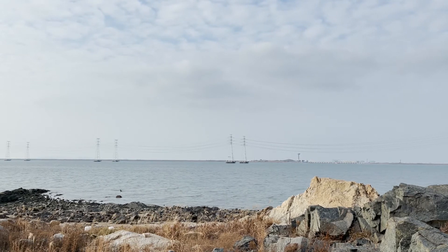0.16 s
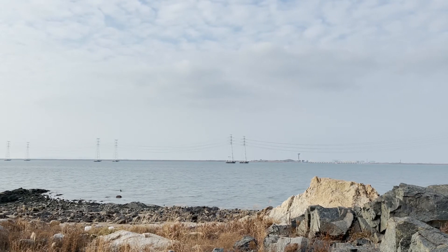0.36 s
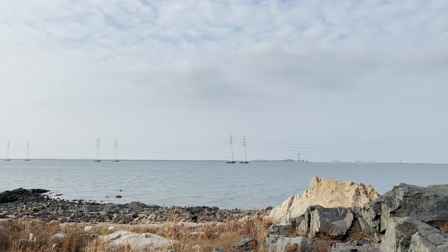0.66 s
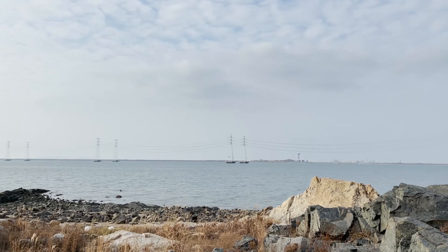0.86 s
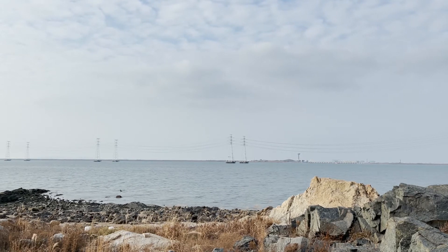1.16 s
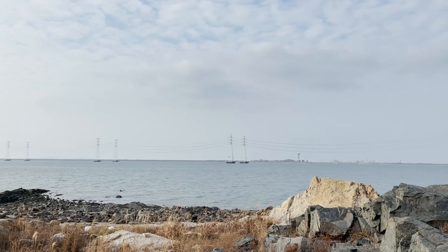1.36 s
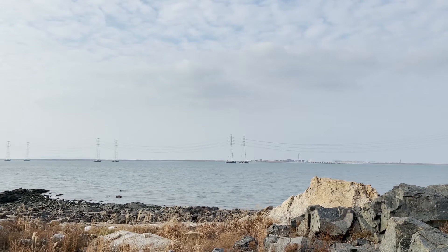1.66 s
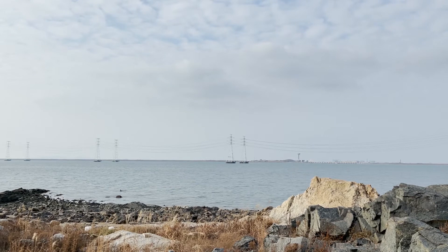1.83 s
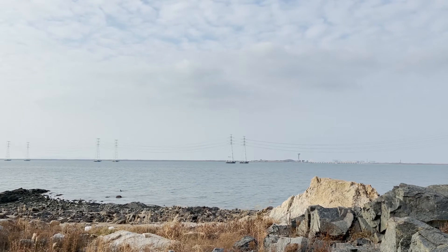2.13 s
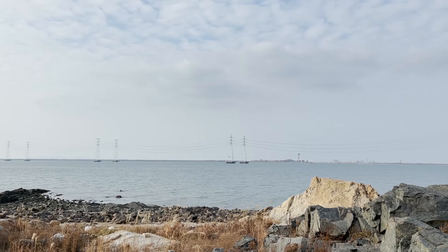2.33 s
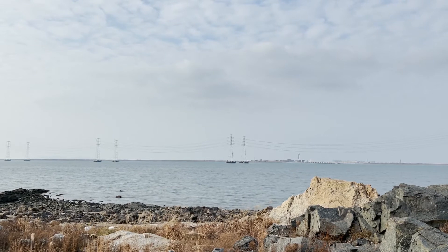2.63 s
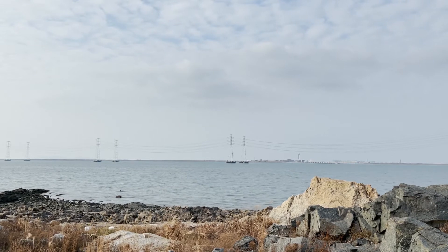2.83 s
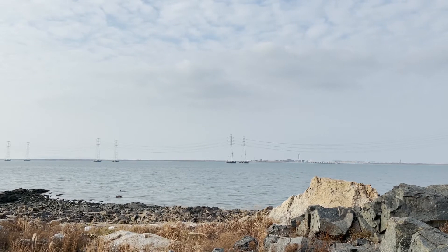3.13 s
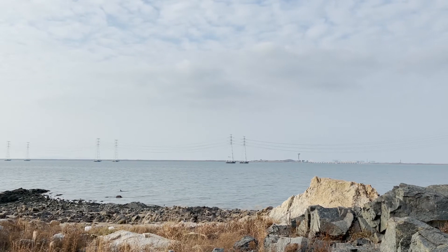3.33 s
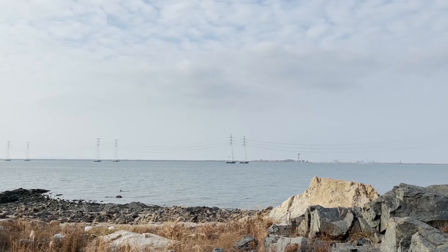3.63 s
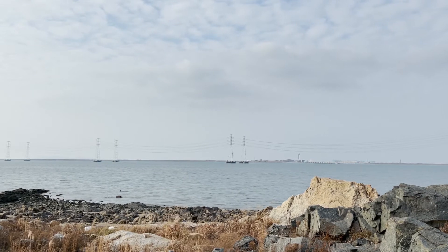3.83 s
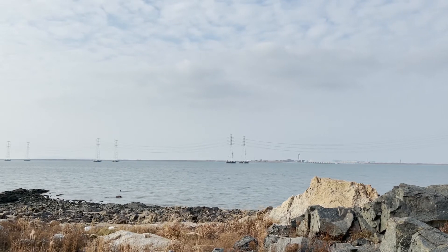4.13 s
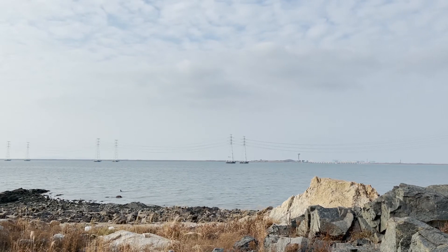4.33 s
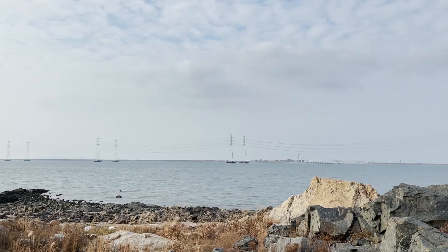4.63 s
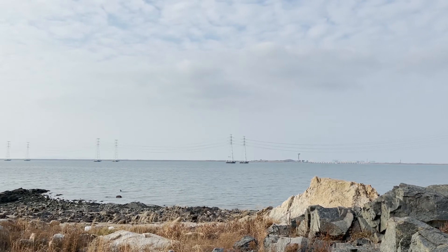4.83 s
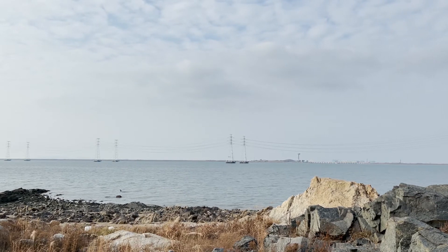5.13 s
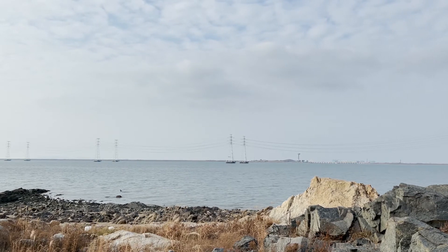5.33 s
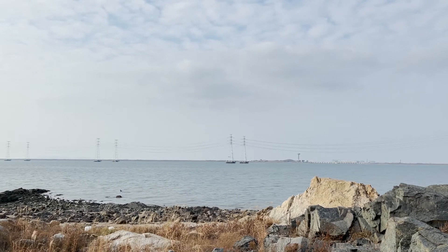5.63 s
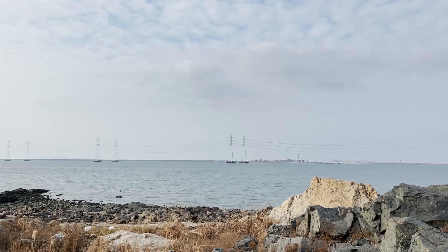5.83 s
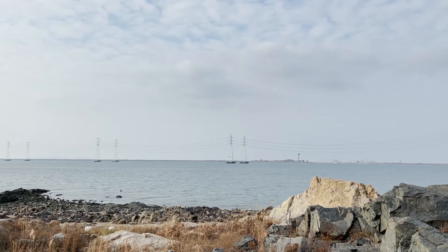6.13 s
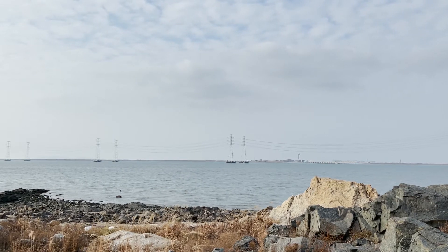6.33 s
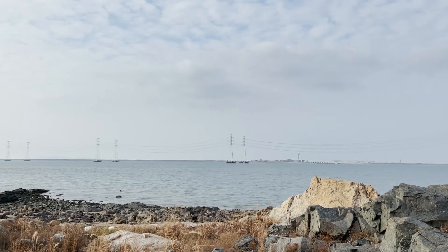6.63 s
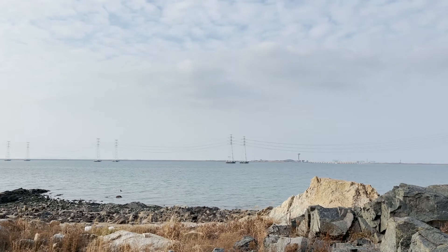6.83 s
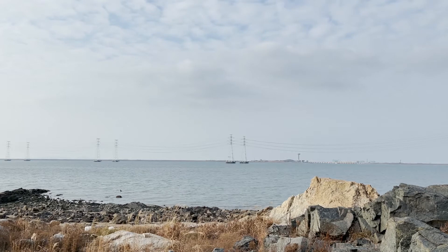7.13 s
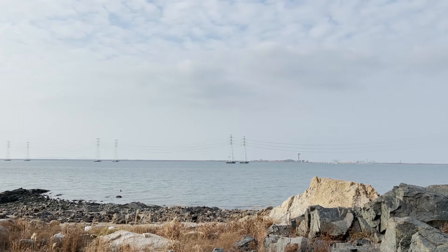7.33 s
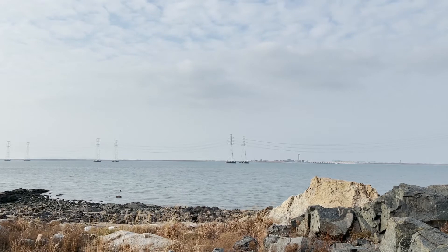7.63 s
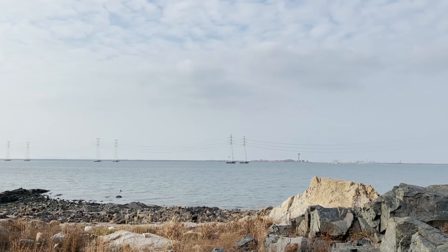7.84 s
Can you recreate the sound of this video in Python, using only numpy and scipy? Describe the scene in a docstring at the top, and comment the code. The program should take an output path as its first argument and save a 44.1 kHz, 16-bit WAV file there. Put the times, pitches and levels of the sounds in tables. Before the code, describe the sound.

Close stereo microphones near stones at the water's edge pick up irregular lapping: tiny rising bubble tones, wet droplet ticks on rock and thin fizzing wash. Activity comes in clusters with near-still gaps between, sides shifting left and right. The stones give short, dry reflections. Behind lies a soft low wash from the far shore with wavering engine hum, and brief soft wind buffets around three to four seconds.

```python
"""Small waves lapping on shore rocks

Trapped air pockets ring as gliding sines, mostly upward in pitch; drops and thin sheets of water splat
on stone as noise bursts with a small bubble; a wave slaps a hollow, exciting its damped resonances.
Random grains and filtered noise make the wash, and short scattered returns come off the stones.
Far engines drone as drifting sines over far-shore noise; a light wind rumbles on both microphone ports."""
import sys
import numpy as np
from scipy import signal
from scipy.fft import rfft, irfft, next_fast_len
from scipy.io import wavfile
from scipy.ndimage import map_coordinates

SR = 44100
rng = np.random.default_rng(int(sys.argv[2]) if len(sys.argv) > 2 else 0)


def put_to_file(sound):
    """Save the sound as 16-bit audio at rate SR, in the file named by the first command-line argument."""
    columns = np.atleast_2d(sound).T  # one column per channel
    safe = np.clip(columns, -1, 1)
    whole_steps = np.round(safe * 32767)
    wavfile.write(sys.argv[1], SR, whole_steps.astype(np.int16))


N = 351918

LAG = 0.07  # samples by which each port shifts per dB of level difference; the louder port is later
# a pinched-off bubble starts up to this share sharp and settles with this decay constant in cycles
SNAP, SNAP_CYCLES = 1.196, 0.7


def amp(db):
    """Decibels to amplitude ratio."""
    return 10 ** (np.asarray(db) / 20)


def unit(x):
    """Normalise to a root-mean-square value of 1."""
    return x / np.sqrt(np.mean(x ** 2) + 1e-20)


def along(points, hz):
    """Interpolate (hz, value) points on a logarithmic frequency axis."""
    f, v = np.transpose(points)
    return np.interp(np.log(hz + 1), np.log(f + 1), v)


def curves(rows):
    """Linear interpolation to one value per sample for each column after the time."""
    s, *cols = np.transpose(rows)
    return [np.interp(np.arange(N) / SR, s, c) for c in cols]


def wobble(rate, count=N):
    """A smooth random curve: a spline through Gaussian knots, rate of them a second."""
    knots = rng.standard_normal(int(count * rate / SR) + 4)
    return map_coordinates(knots, [np.arange(count) * rate / SR])


def filtered(x, response):
    """Linear filtering: the spectrum times a response of frequency."""
    m = next_fast_len(N + SR // 2)
    return irfft(rfft(x, m) * response(np.fft.rfftfreq(m, 1 / SR)), m)[..., :N]


def sides(pan_db):
    """Level-difference panning: left and right gains of mean power 1."""
    pair = amp(np.array([pan_db, -pan_db]) / 2)
    return pair / np.sqrt(np.mean(pair ** 2, axis=0))


def add(out, s, sound, pan_db):
    """Superpose a sound at s seconds, with level and arrival-time differences between the ports."""
    for side, gain, lag in zip(out, sides(pan_db), (LAG * pan_db, -LAG * pan_db)):
        room = side[max(round(s * SR + lag), 0):][:len(sound)]
        room += gain * sound[:len(room)]


def pinch(cycles):
    """Relaxation after pinch-off: extra cycles run while a new bubble drops to its pitch."""
    return SNAP * SNAP_CYCLES * (1 - np.exp(-cycles / SNAP_CYCLES))


def arc(u, start, middle, end):
    """Quadratic interpolation through three values at u = 0, 1/2, 1."""
    return start * (1 - u) * (1 - 2 * u) + 4 * middle * u * (1 - u) + end * u * (2 * u - 1)


def glides(rows, attack, release, waver_db, waver_rate, sag=1, snap=0, shake=0):
    """Frequency modulation: sines whose phase integrates an arc of pitch while the level slides."""
    out = np.zeros((2, N))
    for s, length, *hz, start_db, end_db, pan_db in rows:
        t = np.arange(round((length + release) * SR)) / SR
        u = np.minimum(t / length, 1)
        onset = 1 - np.exp(-(t / attack) ** 2)
        ending = amp(-40 * np.maximum(t - length, 0) / release)
        slide_db = start_db + (end_db - start_db) * u ** sag
        level = amp(slide_db + waver_db * wobble(waver_rate, count=len(t))) * onset * ending
        log_pitch = arc(u, *np.log(hz)) + shake * wobble(2 * waver_rate, count=len(t))
        cycles = np.cumsum(np.exp(log_pitch)) / SR + snap * pinch(hz[0] * t)
        add(out, s, level * np.sin(2 * np.pi * cycles), pan_db)
    return out


def distance():
    """Partly correlated noise for the wash of the far shore, and drifting sines for engine tones."""
    # far water and traffic: hz, relative_db (per Hz)
    shore = [(35, -19), (60, 4), (172, -2.5), (338, -11), (607, -18), (862, -22), (1040, -30), (1440, -27),
             (2300, -34), (3940, -40), (11800, -42), (16000, -47)]
    # side of that wash: hz, left_minus_right_db
    lean = [(60, 6), (130, 10.5), (290, 5), (700, -3.5)]
    # far engine tones, drifting as the engines move: start_s, length_s, start_hz, middle_hz, end_hz,
    # start_db, end_db, left_minus_right_db
    engines = [(0, 1.3, 179, 173, 169, -49.5, -50.5, 5), (1.75, 1.25, 167, 166, 167, -54, -51, 5),
               (0, .7, 412, 411, 410, -65, -64, 2), (2.1, .8, 385, 382, 380, -66, -66, 2),
               (3.0, 3.0, 165, 157, 143, -58, -58, 6), (0, 3.0, 266, 257, 238, -63, -62, 4),
               (.2, 1.5, 207, 201, 193, -57, -56, 0), (.2, 2.2, 218, 224, 231, -59, -60, -3),
               (3.7, 2.5, 213, 195, 185, -57, -56, -4), (5.0, 1.0, 99, 101, 104, -57, -57, 0),
               (6.9, .8, 262, 277, 292, -64, -62, 3), (7.0, 1.0, 127, 132, 140, -58, -53, 3)]
    common, *own = rng.standard_normal((3, N))
    noise = 0.79 * common + np.array(own)
    hiss = filtered(noise, lambda hz: amp(along(shore, hz)) * sides(along(lean, hz)))
    tones = glides(engines, attack=0.012, release=0.036, waver_db=2.0, waver_rate=3.53)
    return amp(-49.0 + 1.33 * wobble(2.94)) * unit(hiss) + tones


def wind():
    """Low-frequency pressure noise at each port: lumpy buffeting, uncorrelated from port to port."""
    # strength of the buffets: time_s, relative_db
    gusts = [(0.0, -59), (2.51, -69), (3.15, -50), (3.51, -62), (3.9, -49), (4.15, -44), (4.35, -52),
             (5.04, -60), (7.98, -61)]
    # spectrum of the buffeting: hz, relative_db (per Hz)
    rumble_spectrum = [(8.8, -13), (15, 1.5), (51, 2), (178, -11.5), (200, -5.5), (260, -39), (440, -120)]
    buffet_db, = curves(gusts)
    rumble = filtered(rng.standard_normal((2, N)), lambda hz: amp(along(rumble_spectrum, hz)))
    lumps_db = 3.1 * np.array([wobble(23), wobble(6.7)])  # left, right
    return amp(buffet_db + 7.5) * unit(rumble * amp(lumps_db))


def rocks(x):
    """Diffuse reflection: short scattered returns from the stones, each frequency with its own decay."""
    # decay off the stones: hz, t60_s
    decay = [(300, 0.14), (2000, 0.038), (10000, 0.033)]
    hz, t, z = signal.stft(rng.standard_normal((2, SR // 4)), SR, nperseg=128)
    tail = signal.istft(z * amp(-60 * t / along(decay, hz)[:, None]), SR, nperseg=128)[1]
    return signal.fftconvolve(x, tail / np.linalg.norm(tail[0]), axes=1)[:, :N]


def laps():
    """Power summation of wavelets over the calm: trickle level, spray level and side at every sample."""
    # wavelets breaking on the stones: crest_s, trickle_relative_db, spray_relative_db, left_minus_right_db
    wavelets = [(0.01, -63, -75.5, 12), (0.11, -67, -70, 4.5), (0.42, -68, -68.5, 5.5),
                (0.53, -62, -69, 11), (0.87, -54, -63.5, -0.5), (1.06, -55, -66, 0), (1.23, -46, -56, 9),
                (1.3, -47, -56, 8), (1.34, -50, -54, -2), (1.52, -47, -57, 2.5), (1.78, -49.5, -61.5, -0.5),
                (2.05, -54, -60, -3.5), (2.28, -53, -68, -1), (2.45, -57, -66.5, -2.5), (2.7, -49, -58, 6),
                (2.83, -56, -58.5, -9.5), (2.905, -58, -58, -1), (3.1, -58, -64.5, -2),
                (3.37, -60, -66.5, -2), (3.48, -67, -67.5, 8), (3.7, -58.5, -76.5, 7), (4.08, -52, -60, -3),
                (4.17, -46, -62, -8.5), (4.25, -52, -60, -6.5), (4.41, -53.5, -66, -3.5),
                (4.57, -56, -76, -8), (4.9, -61, -63.5, -1.5), (5.29, -55, -66.5, -2),
                (5.51, -55.5, -71.5, -12), (5.64, -58, -76.5, -9), (5.88, -60, -67, -5.5),
                (6.22, -63, -75, -4.5), (6.42, -58, -57, 7.5), (6.48, -57, -57, 5), (6.57, -62, -64, 8),
                (6.665, -48, -53, 18), (6.75, -49, -55, 12), (6.88, -58, -64.5, 18), (7.07, -56, -66, 11),
                (7.14, -70, -66.5, 18), (7.5, -61, -69, 9.5), (7.825, -58, -60.5, 21), (7.865, -45, -56, 9)]
    swell_db_per_s, drain_db_per_s = 160, 120  # trickle's build to the crest and run-off
    spray_faster = 2.2  # spray comes and goes this much faster
    calm_db, calm_spray_db = -75, -78  # between wavelets, on the scale of the table
    s, trickle_db, spray_db, pan_db = np.transpose(wavelets)[..., None]
    t = np.arange(0, N + 64, 64) / SR
    shape_db = np.minimum(swell_db_per_s * (t - s), drain_db_per_s * (s - t))
    # doubled decibels turn amplitude into power
    trickle = amp(2 * (trickle_db + shape_db))
    spray = amp(2 * (spray_db + spray_faster * shape_db))
    side = np.sum(pan_db * trickle, axis=0) / (trickle.sum(axis=0) + 1e-20)
    trickle_level = 10 * np.log10(trickle.sum(axis=0) + amp(2 * calm_db))
    spray_level = 10 * np.log10(spray.sum(axis=0) + amp(2 * calm_spray_db))
    return curves(np.transpose([t, trickle_level, spray_level, side]))


def grains(level_db, pan_db, count, centre_hz, octaves, cycles, rise, spread_db, scatter_db, clump):
    """A random point process of damped bubble tones: lively water has both more and bigger ones."""
    lively = amp(level_db)
    chance = np.cumsum(np.sqrt(lively) * np.exp(clump * wobble(85)))
    draw, normal = rng.random((count, 2)), rng.standard_normal((count, 3))
    start = np.searchsorted(chance, draw[:, 0] * chance[-1])
    hz = np.clip(centre_hz * 2 ** (octaves * normal[:, :1]), 300, 15000)
    life = cycles * np.exp(0.5 * normal[:, 1:2]) / hz  # decay constant in seconds
    t = np.arange(min(round(8 * cycles * SR / centre_hz), 900)) / SR
    taper = np.cos(np.pi / 2 * t / t[-1])
    shape = np.exp(-t / life) * (1 - np.exp(-14 * t / life)) * taper
    size = amp(-spread_db * np.log(draw[:, 1:] + 0.0084))
    phase = hz * t * (1 + rise * t / life) + pinch(hz * t)
    ring = size * shape * np.sin(2 * np.pi * phase)
    pan = pan_db[start] + scatter_db * normal[:, 2]
    pair = []
    for way, gain in zip((1, -1), sides(pan)):
        first = start + np.round(way * LAG * pan).astype(int)
        where = np.abs(first[:, None] + np.arange(len(t)))
        pair.append(np.bincount(where.ravel(), (ring * gain[:, None]).ravel(), N + SR)[:N])
    return lively ** 0.75 * np.sqrt(np.mean(np.sqrt(lively))) * unit(np.array(pair))


def foam(level_db, pan_db, spectrum, ragged_db):
    """Band-shaped noise for bubbles too many to tell apart: a ragged fizz with a weak common part."""
    common, *own = rng.standard_normal((3, N))
    noise = 0.17 * common + np.array(own)
    fizz = unit(filtered(noise, lambda hz: amp(along(spectrum, hz))))
    return amp(level_db + ragged_db * wobble(70) + 1.15 * wobble(250)) * sides(pan_db) * fizz


def wash():
    """Superposed bubble and droplet grains: most follow the waves, some drain from the stones all the time."""
    # fizz of a breaking wavelet: hz, relative_db (per Hz)
    foam_spectrum = [(300, -20), (700, -7), (1500, 0), (3000, -3.5), (6500, -5), (15000, -33)]
    # finest spray: hz, relative_db (per Hz)
    mist_spectrum = [(1500, -30), (4000, -1), (12000, 4)]
    trickle_db, spray_db, pan_db = laps()
    plinks = grains(trickle_db, pan_db, count=800, centre_hz=1300, octaves=0.591, cycles=8.9,
                    rise=0.046, spread_db=1.5, scatter_db=-4.5, clump=0.4)
    trickle = grains(trickle_db, pan_db, count=2800, centre_hz=2348, octaves=0.695, cycles=5.46,
                     rise=0.06, spread_db=5.5, scatter_db=10.0, clump=0.78)
    spray = grains(spray_db, pan_db, count=3000, centre_hz=7700, octaves=0.566, cycles=3.9,
                   rise=0.068, spread_db=5.5, scatter_db=3.5, clump=0.87)
    drain = grains(np.full(N, -64.0), pan_db, count=900, centre_hz=2104, octaves=0.805, cycles=7.8,
                   rise=0.0577, spread_db=2.5, scatter_db=3.5, clump=0.6)
    fizz = amp(-9.5) * foam(trickle_db, pan_db, foam_spectrum, ragged_db=4.5)
    mist = amp(-11.0) * foam(spray_db, pan_db, mist_spectrum, ragged_db=5)
    blips = grains(trickle_db, pan_db, count=420, centre_hz=800, octaves=0.51, cycles=22.4,
                   rise=0.092, spread_db=4.0, scatter_db=6, clump=0.34)
    ticks = grains(spray_db, pan_db, count=500, centre_hz=6100, octaves=0.65, cycles=0.89,
                   rise=0.035, spread_db=3.5, scatter_db=7.5, clump=0.69)
    bubbles = amp(-6.5) * blips + amp(-4.0) * plinks + amp(-4.0) * trickle + drain
    droplets = amp(4.0) * ticks + amp(4.5) * spray
    return bubbles + droplets + fizz + mist


def splats():
    """Impact noise and bubble resonance: a drop cracks raggedly on wet stone and traps a ringing bubble."""
    # drops on stone: start_s, peak_db, centre_hz, left_minus_right_db
    drops = [(0.101, -30, 4200, 5), (0.207, -40, 3420, -5), (0.377, -39, 4200, 8), (0.5065, -40, 3420, -8),
             (0.5887, -42, 4330, 10), (0.6324, -39, 2740, -9), (0.678, -42.5, 2970, -8),
             (0.857, -45, 2330, -6), (0.957, -38, 3600, -6), (1.031, -38, 3190, -9),
             (1.1798, -27.5, 2600, 11), (1.244, -35, 4400, 18.5), (1.266, -24.5, 2610, -2),
             (1.338, -36, 3580, 16), (1.3445, -23.5, 5400, 5), (1.3412, -19.5, 2010, 18),
             (1.3866, -26, 4300, 17), (1.438, -32.5, 3100, 15), (1.4796, -40.5, 3200, 5),
             (1.502, -28, 2250, 17), (1.666, -34.5, 2930, 0), (1.9, -38, 1960, -3.5),
             (1.913, -31.5, 11140, -2), (2.01, -32.5, 2330, -1), (2.056, -37.5, 2040, -5),
             (2.151, -36, 2160, -5), (2.043, -29, 6450, -2), (2.376, -36.5, 3100, -7),
             (2.445, -36, 3800, -9), (2.683, -31.5, 2700, 0), (2.612, -31.5, 2500, -6),
             (2.6637, -31, 1970, 5), (2.7138, -31, 6700, 9), (2.7883, -20, 5730, -7),
             (2.808, -28, 4930, -9), (2.829, -42, 7500, -3), (2.895, -34, 11100, 7.5),
             (2.908, -29, 8450, 7.5), (2.914, -27.5, 5580, 20), (2.9312, -33, 10750, 3.5),
             (2.988, -37.5, 1680, 6), (2.9138, -35, 2340, 9.5), (3.1425, -31, 3520, -9),
             (3.501, -41.5, 5830, -2), (2.897, -35.5, 2580, 23), (3.932, -38, 6600, 1),
             (4.0517, -34.5, 3730, -4.5), (4.0872, -30, 7050, -5.5), (4.135, -34, 2150, -8),
             (4.176, -43, 1980, -4), (4.415, -35.5, 2800, -6.5), (4.3998, -33, 2250, -3),
             (4.7906, -37, 4500, -4), (5.195, -39.5, 2070, -39), (6.075, -35, 3420, 17),
             (6.267, -33.5, 1540, 9), (6.374, -46, 2100, 7), (6.3823, -32, 8200, 2), (6.389, -32, 2250, 14),
             (6.409, -29.5, 5470, 11), (6.4258, -33, 5100, 8), (6.43, -30, 2650, 15),
             (6.4673, -15, 10200, 8), (6.4705, -22, 8500, 5), (6.482, -31, 12000, 10),
             (6.4755, -26, 6680, 13), (6.486, -30, 2740, 17), (6.4992, -28, 5770, 7.5),
             (6.538, -27.5, 4060, 15), (6.6349, -24, 5860, 6), (6.944, -40.5, 2300, -6),
             (6.962, -40, 2290, 3), (6.983, -35, 2940, 9), (7.428, -32.5, 3350, 18), (7.819, -38, 1970, 6),
             (7.892, -38, 3500, 8), (1.044, -35, 3030, -2), (3.188, -37.5, 2320, -7),
             (3.237, -41.5, 1970, -9), (3.979, -39, 2000, 5), (6.6386, -28.5, 2480, 16),
             (6.6435, -28, 4280, 14), (6.641, -26.5, 1760, 16), (6.6887, -34, 6100, 5),
             (6.738, -40, 5600, 8), (6.764, -46, 1610, 10), (6.659, -33, 5530, 8), (1.373, -34, 7400, 4),
             (7.34, -41.5, 1380, 5), (0.412, -44, 9050, 6), (0.446, -44, 10700, 3), (4.067, -37, 4240, -3),
             (4.91, -39.5, 2290, -9)]
    t60_s, longer_per_db = 0.0091, 0.35  # crackle of a -35.5 dB drop; bigger ones last longer (dB of time)
    rise_s = 0.0007  # time constant of the crackle's soft rise, which lasts three of these
    out, t = np.zeros((2, N)), np.arange(SR // 10) / SR
    hz, after = np.fft.rfftfreq(len(t), 1 / SR), np.maximum(t - 3 * rise_s, 0)
    rise = np.exp(np.minimum(t / rise_s - 3, 0))
    bubble_onset = 1 - np.exp(-(after / 0.00066) ** 2)
    for s, db, centre_hz, pan_db in drops:
        low_cut = 1 / (1 + (0.49 * centre_hz / (hz + 1)) ** 4)
        high_cut = 1 / (1 + (hz / (1.86 * centre_hz)) ** 4)
        noise = unit(irfft(rfft(rng.standard_normal(len(t))) * low_cut * high_cut, len(t)))
        decay_db = -60 * after / (t60_s * amp(longer_per_db * (db + 35.5)))
        crackle = noise * amp(10.4 * wobble(871, count=len(t)) + decay_db) * rise
        # the bubble loses 60 dB in 45 periods of the centre frequency, its pitch rising slightly
        phase = centre_hz * after * (1 + 3 * after) + pinch(centre_hz * after)
        bubble = amp(8.5 - 60 * after * centre_hz / 45) * np.sin(2 * np.pi * phase)
        burst = crackle + bubble * bubble_onset
        add(out, s - 3 * rise_s, amp(db) * burst / np.abs(burst).max(), pan_db)
    return out


def slap():
    """Impulsive excitation of cavity modes: a wave shuts on a hollow between rocks, to the left."""
    # weaker knocks leading up to the hard slap, the slap itself, and its returns off the rocks:
    # start_s, gain_db
    impacts = [(7.8672, -34), (7.8702, -17), (7.8724, -21), (7.873, -1), (7.8757, -16), (7.8776, -20),
               (7.881, -28)]
    # modes of the hollow that rings under it: hz, relative_db, t60_s
    modes = [(876, -11, 0.02), (1433, 9, 0.0046), (1840, -8, 0.0076), (3560, -14, 0.0078),
             (4850, -19.5, 0.009)]
    out, t = np.zeros((2, N)), np.arange(SR // 10) / SR
    ring = sum(amp(level - 60 * t / t60) * np.sin(2 * np.pi * hz * t) for hz, level, t60 in modes)
    onset = 1 - np.exp(-(t / 0.00032) ** 2)
    for s, db in impacts:
        crack = amp(-24.5 - 60 * t / 0.023) * rng.standard_normal(len(t))
        add(out, s, amp(db) * (ring + crack) * onset, pan_db=9.5)
    return out


def gurgles():
    """Bubble resonance: each air pocket bends slowly, then fast, to its last pitch and fades into the wash."""
    # air pockets: start_s, length_s, start_hz, end_hz, start_db, left_minus_right_db
    pockets = [(0.148, 0.03, 800, 930, -45, -8), (0.469, 0.073, 694, 1600, -48, -8),
               (0.844, 0.035, 1266, 940, -39.5, -17), (0.872, 0.064, 847, 1170, -44.5, -2),
               (0.98, 0.049, 492, 653, -32.5, -9), (1.035, 0.06, 374, 775, -36, -4),
               (1.09, 0.022, 1260, 1790, -32.5, -3), (1.091, 0.047, 430, 520, -38, -5),
               (1.134, 0.058, 483, 1274, -36.5, 2), (1.108, 0.033, 850, 880, -38.5, -5),
               (1.18, 0.0097, 1100, 980, -21.5, 11), (1.191, 0.053, 772, 837, -41, 12),
               (1.242, 0.026, 1460, 1760, -28, -1), (1.317, 0.024, 772, 1510, -38, 11),
               (1.341, 0.062, 560, 644, -31, 7), (1.369, 0.047, 714, 904, -38.5, 5),
               (1.41, 0.02, 820, 460, -29.5, 13), (1.518, 0.02, 1513, 1240, -30, 7),
               (1.554, 0.025, 705, 680, -45.5, -4), (1.577, 0.023, 1830, 1390, -35, -6),
               (1.711, 0.061, 562, 1112, -30, -6), (1.761, 0.013, 1770, 1480, -25.5, -5),
               (1.785, 0.017, 1580, 1810, -30, -5), (1.849, 0.017, 1640, 1880, -38.5, -5),
               (1.955, 0.028, 980, 830, -48, -11), (2.043, 0.03, 800, 870, -34.5, -6),
               (2.21, 0.028, 970, 820, -39.5, -6.5), (2.257, 0.069, 509, 772, -42.5, -4.5),
               (2.7896, 0.028, 1008, 990, -18.5, -12.5), (2.79, 0.044, 637, 530, -36, -9),
               (2.824, 0.072, 610, 1196, -42, -10), (2.854, 0.046, 1116, 1130, -40.5, -13),
               (2.871, 0.026, 830, 710, -36, 18), (2.911, 0.066, 692, 1115, -47, -13),
               (2.765, 0.031, 1204, 1100, -45, -17), (3.674, 0.011, 1370, 1610, -44, -5),
               (3.702, 0.015, 1980, 2140, -45, -7), (4.685, 0.042, 956, 1170, -55.5, -10),
               (5.121, 0.029, 788, 1370, -58, -7), (5.155, 0.049, 570, 1350, -76, 8),
               (5.225, 0.059, 840, 1600, -65, -18), (2.943, 0.034, 994, 1150, -48, 1),
               (0.74, 0.012, 850, 776, -48, -4), (0.988, 0.023, 1195, 1300, -44, -9),
               (1.62, 0.02, 443, 413, -50, -6), (7.897, 0.026, 1040, 1390, -54, -9),
               (6.697, 0.014, 1280, 1900, -36, 11), (2.608, 0.0041, 7780, 8000, -11.5, -3),
               (2.7892, 0.0023, 4500, 4500, -6.5, -18), (2.79, 0.0017, 9600, 9000, -1.5, -2),
               (2.146, 0.029, 723, 840, -50, -7), (2.253, 0.019, 1540, 1800, -35.5, -5),
               (2.279, 0.018, 1610, 1700, -46, -2), (2.408, 0.0076, 1220, 1360, -34.5, -3),
               (2.609, 0.0085, 1170, 1180, -43, -12), (1.292, 0.02, 1175, 900, -33, 11),
               (1.254, 0.034, 494, 383, -34.5, 10), (1.768, 0.018, 810, 1310, -32, -3),
               (4.113, 0.061, 950, 1510, -42, -12), (4.149, 0.04, 726, 900, -27, 10),
               (4.02, 0.046, 788, 880, -47, -1), (4.256, 0.042, 740, 1000, -46, -4),
               (4.36, 0.032, 634, 800, -47, -4), (4.237, 0.014, 1280, 1200, -26, -11),
               (4.291, 0.023, 1180, 1790, -39, -16), (4.292, 0.051, 464, 480, -43.5, -6),
               (4.41, 0.031, 850, 1630, -42, -4), (4.404, 0.033, 577, 715, -42.5, -7),
               (4.549, 0.019, 1154, 1280, -36, -10), (4.613, 0.017, 1280, 970, -35.5, -10),
               (5.284, 0.024, 1560, 1560, -36.5, -10), (5.421, 0.04, 699, 960, -50.5, 12),
               (5.483, 0.042, 1014, 1310, -42.5, -13), (5.601, 0.012, 1050, 770, -42, -16),
               (5.626, 0.076, 695, 1346, -45.5, -9), (5.967, 0.019, 1930, 2930, -31, -5),
               (6.081, 0.022, 950, 825, -44.5, -14), (6.176, 0.017, 1870, 2280, -41.5, -8),
               (6.27, 0.016, 1200, 1180, -34.5, 11), (6.546, 0.03, 607, 970, -46, 12),
               (6.665, 0.018, 1426, 1300, -27, 8.5), (6.681, 0.012, 2570, 2700, -32, 15),
               (6.711, 0.039, 1930, 1730, -40, 10), (6.778, 0.018, 1700, 1700, -33, 8),
               (7.067, 0.013, 1270, 1150, -32.5, 7), (7.588, 0.014, 1370, 1270, -44, -5),
               (7.772, 0.0075, 1640, 1710, -39, 9), (7.81, 0.027, 1060, 1490, -28, 9),
               (7.8535, 0.0068, 2320, 2300, -23, 14), (7.941, 0.016, 720, 710, -45, -26)]
    bend = 0.318  # share of the pitch change, in octaves, done at half the length
    # fade target of a steady 1 kHz pocket; higher pitch lowers it, any pitch change raises it
    fade_db, fade_db_per_octave, change_db_per_octave = -57, -7.5, 1.5
    loud_share = 0.22  # weight of the start level in the end level, so loud pockets end louder
    rows = []
    for s, length, hz, end_hz, db, pan_db in pockets:
        middle_hz = hz * (end_hz / hz) ** bend
        change = change_db_per_octave * abs(np.log2(end_hz / hz))
        target_db = fade_db + fade_db_per_octave * np.log2(hz / 1000) + change
        end_db = db * loud_share + target_db * (1 - loud_share)
        rows.append((s, length, hz, middle_hz, end_hz, db, end_db, pan_db))
    return glides(rows, attack=0.00034, release=0.0048, waver_db=1.6, waver_rate=58.5,
                  sag=1.08, snap=0.38, shake=0.023)


def scene():
    """Superposition of the near water, its returns off the rocks, the distance and the wind."""
    water = gurgles() + splats() + slap() + wash()
    return water + amp(-9.5) * rocks(water) + distance() + wind()


def record(dry):
    """Saturation and band limiting: full-scale peaks are clipped, then all from 16.3 kHz up is removed."""
    top_hz = 16300
    clipped = np.clip(dry, -1, 1)
    return filtered(clipped, lambda hz: hz < top_hz)


dry = scene()
out = record(dry)
put_to_file(out)
```